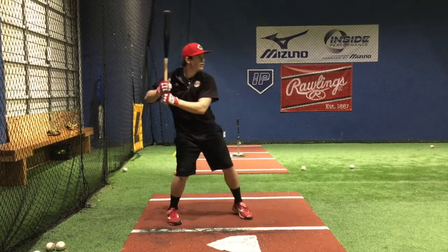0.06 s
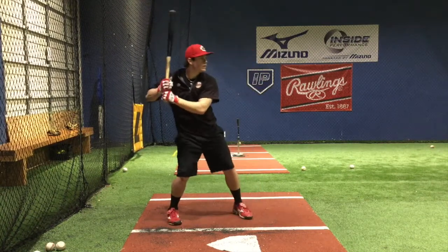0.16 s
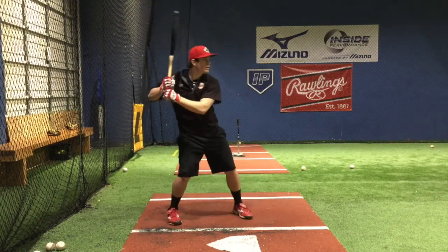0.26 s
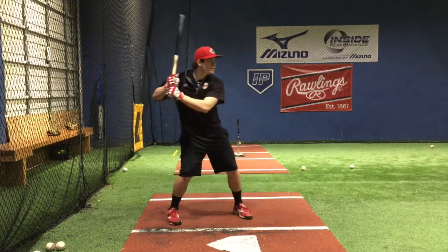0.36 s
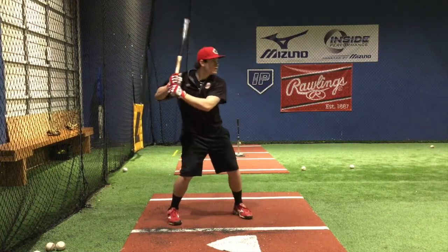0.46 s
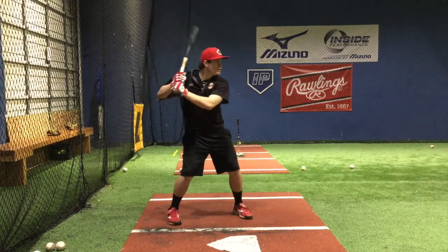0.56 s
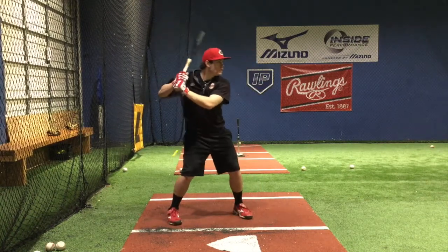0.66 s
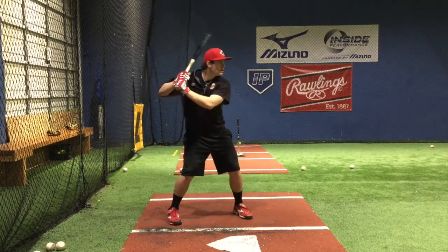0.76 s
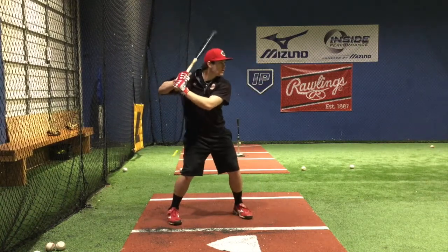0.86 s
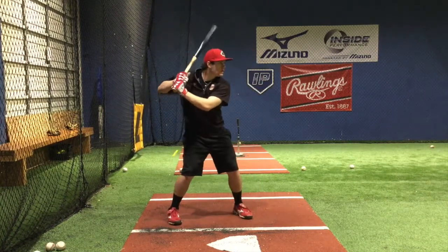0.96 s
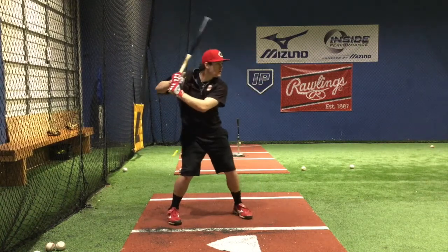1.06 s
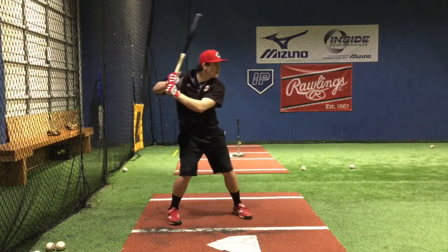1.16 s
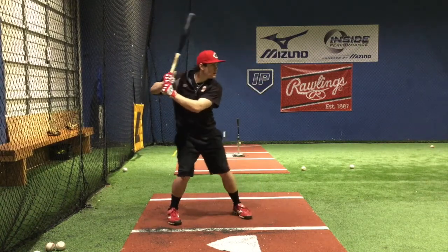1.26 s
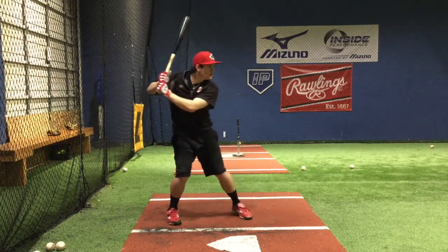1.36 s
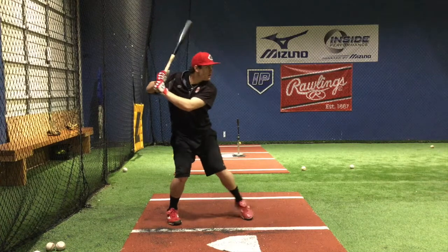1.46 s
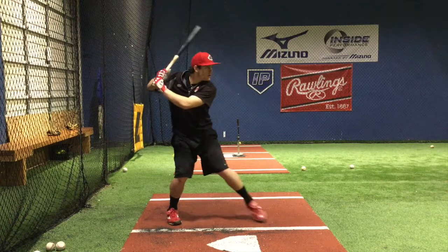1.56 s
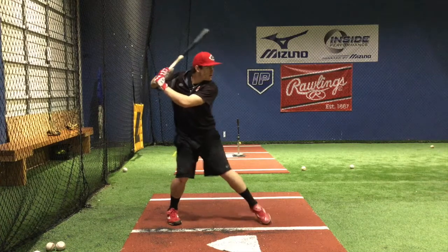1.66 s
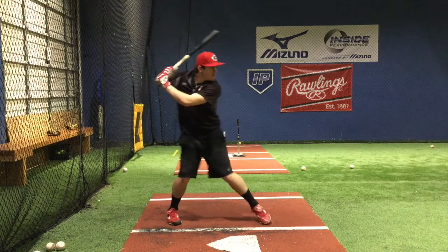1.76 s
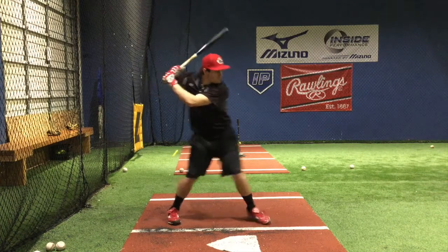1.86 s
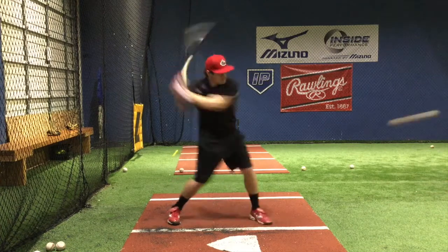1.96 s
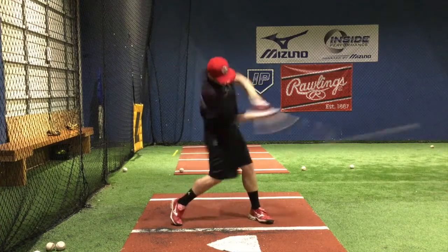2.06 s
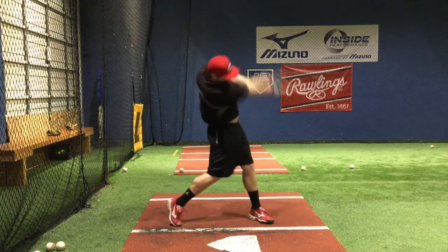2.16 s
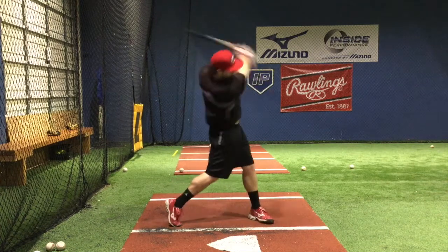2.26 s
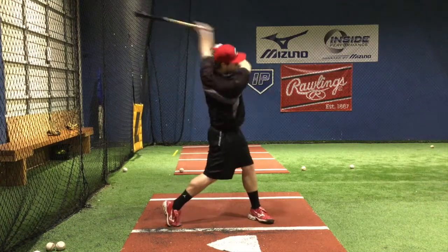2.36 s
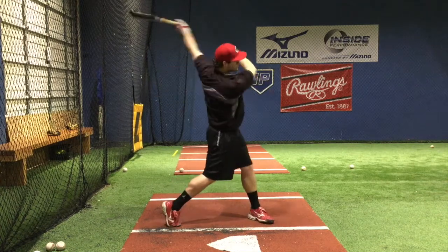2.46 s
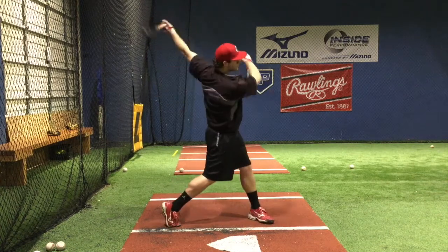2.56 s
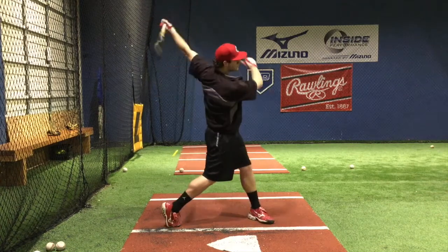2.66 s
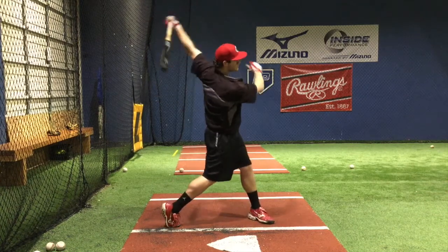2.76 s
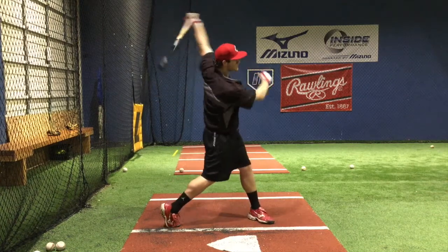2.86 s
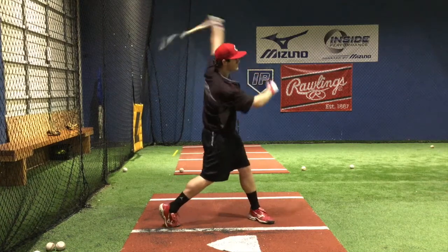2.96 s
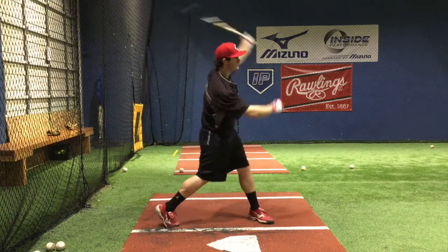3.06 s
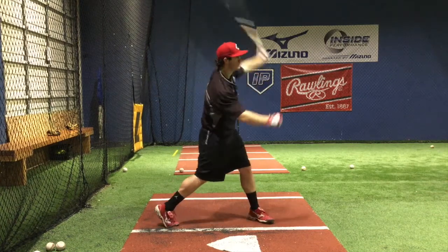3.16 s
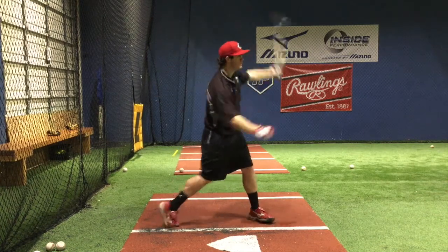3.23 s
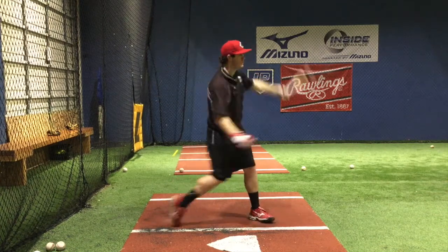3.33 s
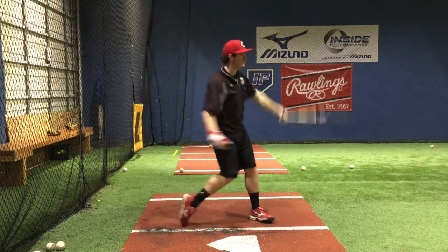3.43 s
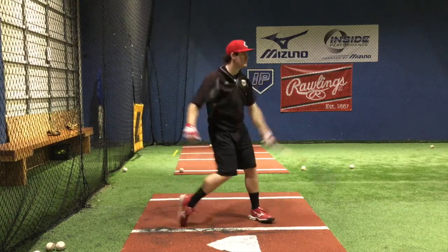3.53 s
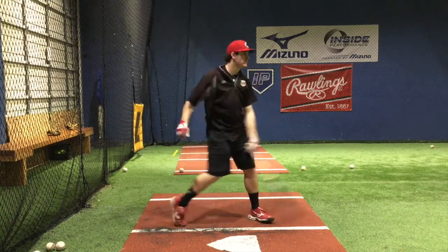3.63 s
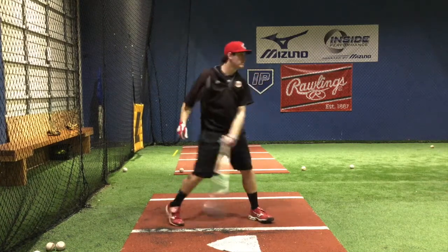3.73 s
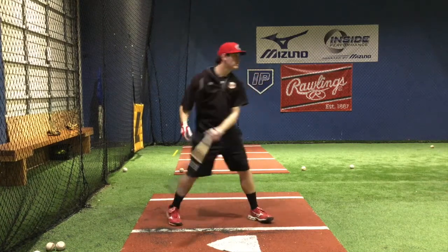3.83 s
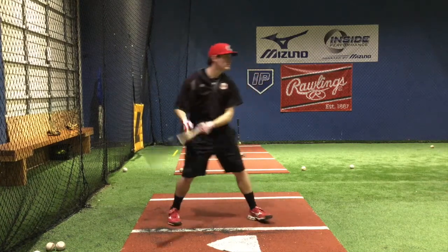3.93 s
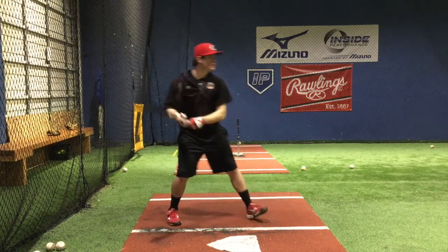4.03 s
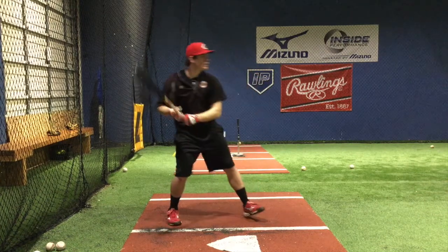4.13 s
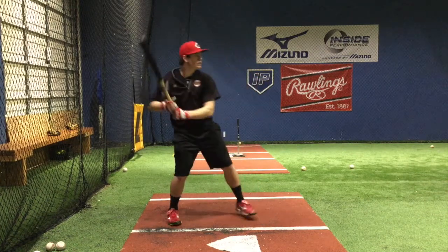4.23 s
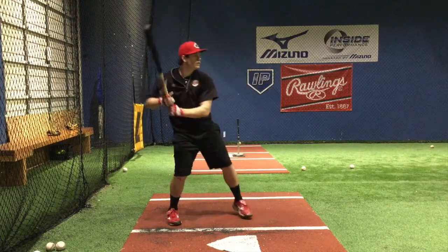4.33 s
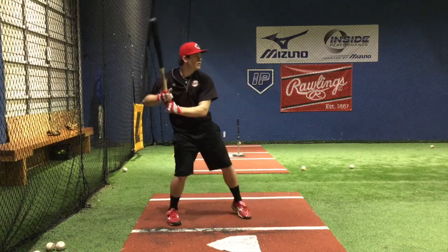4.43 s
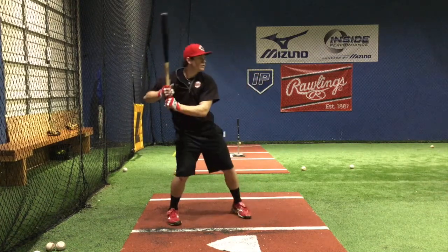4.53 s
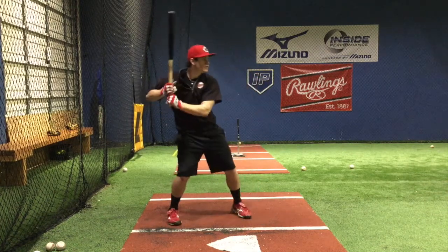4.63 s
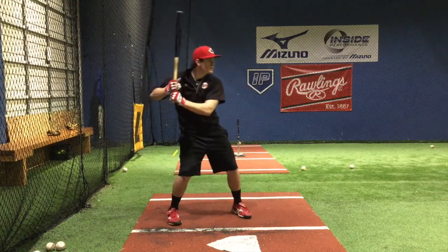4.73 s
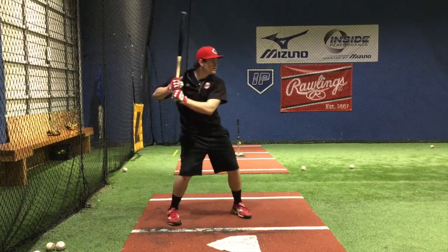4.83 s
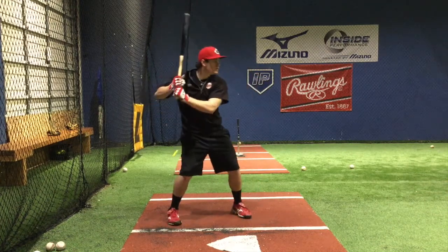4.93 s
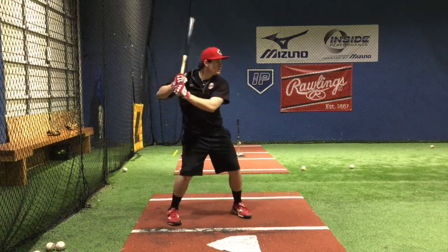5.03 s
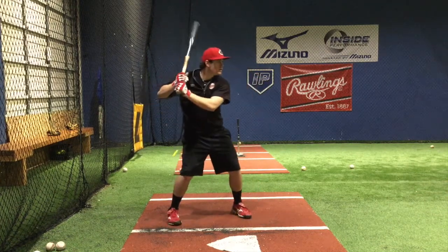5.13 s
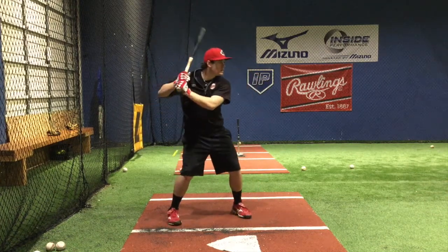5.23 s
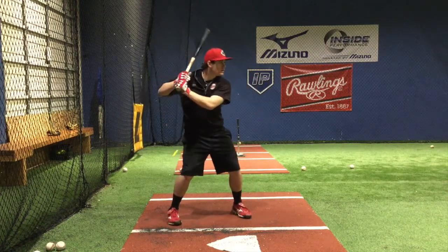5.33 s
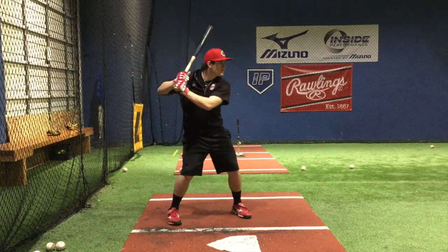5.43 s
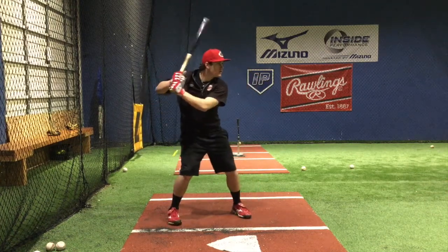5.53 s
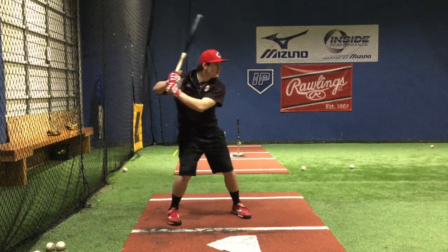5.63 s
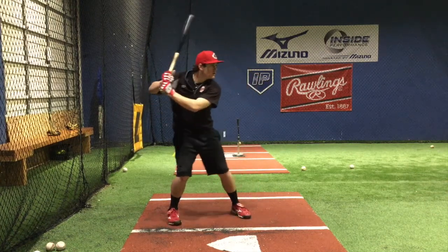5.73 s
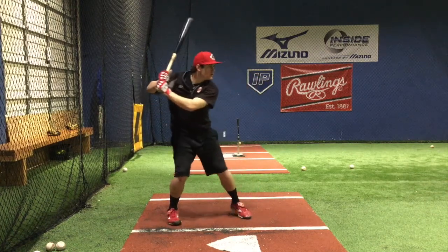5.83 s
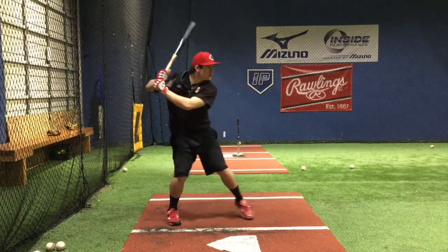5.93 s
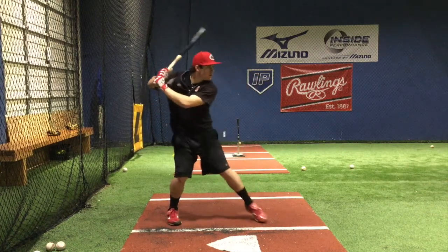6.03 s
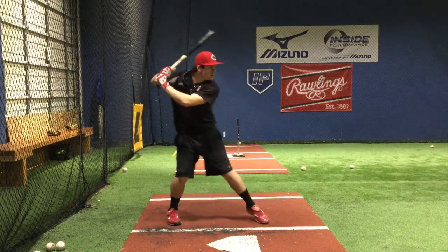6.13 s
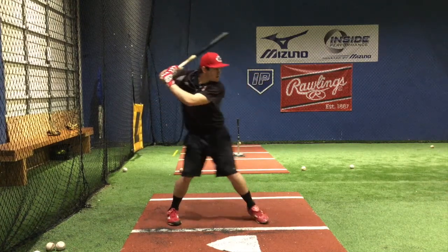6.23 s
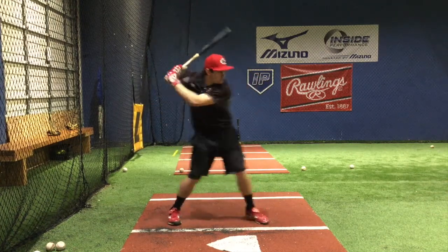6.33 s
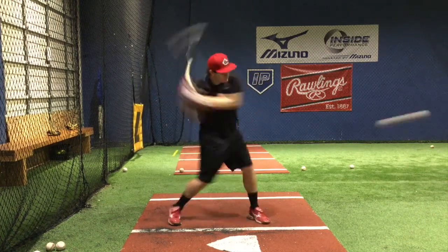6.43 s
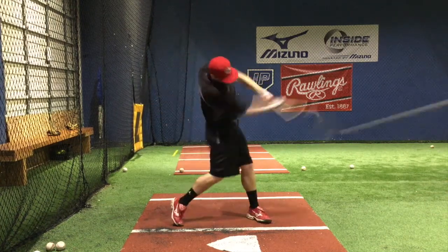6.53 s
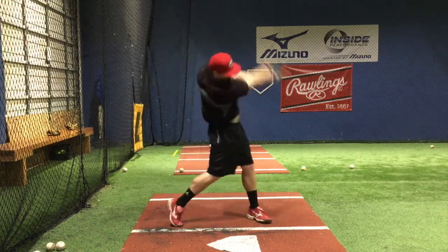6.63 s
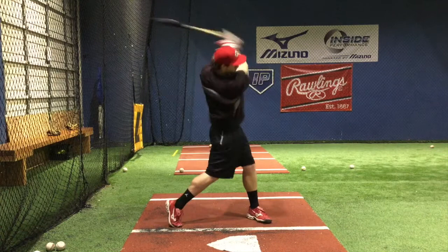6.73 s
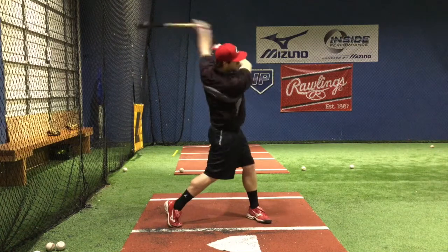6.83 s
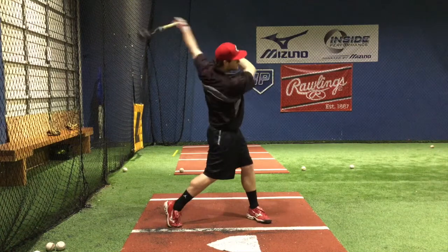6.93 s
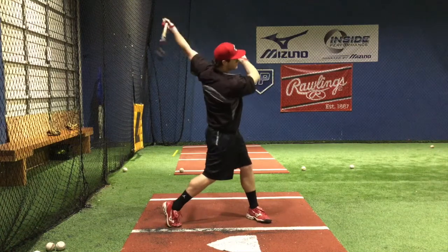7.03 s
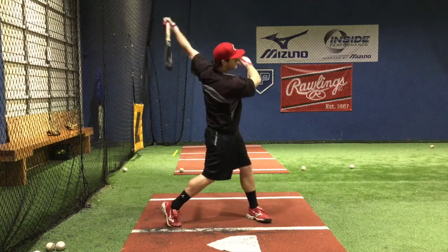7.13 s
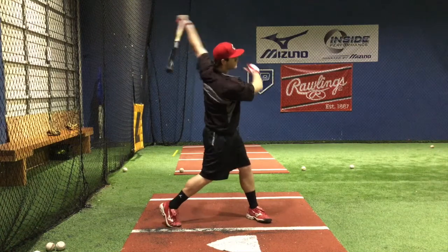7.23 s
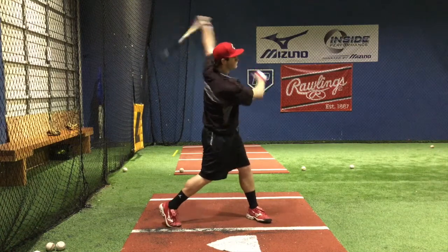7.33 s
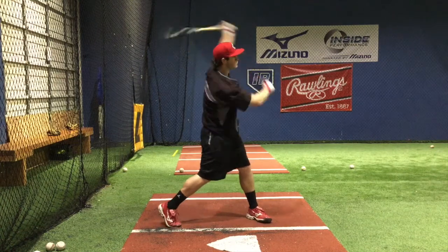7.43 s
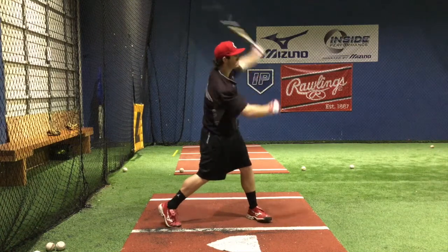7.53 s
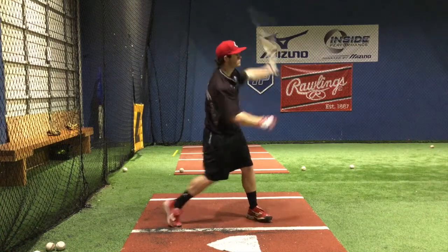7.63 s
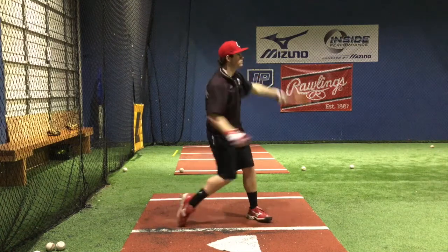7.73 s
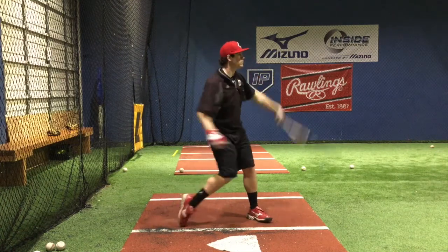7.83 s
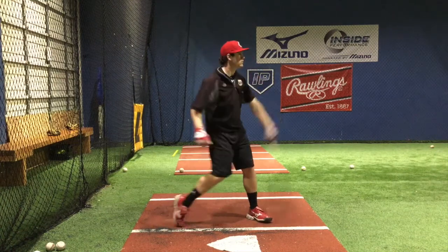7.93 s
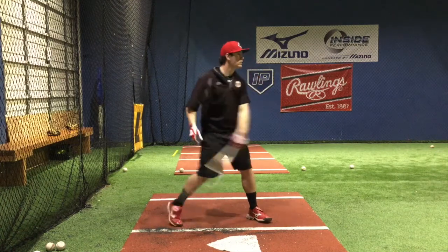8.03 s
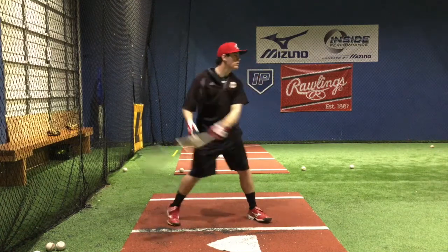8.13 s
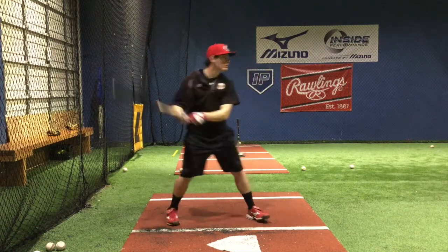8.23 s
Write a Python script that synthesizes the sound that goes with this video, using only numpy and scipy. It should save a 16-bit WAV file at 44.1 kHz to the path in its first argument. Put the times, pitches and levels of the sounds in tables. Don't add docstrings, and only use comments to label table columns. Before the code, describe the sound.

Two sharp, overloaded bat cracks ring through a big hall, one followed by a hollow wall thud, with net rattles, turf shuffles and steady fan rumble.

```python
import sys
import numpy as np
from scipy import signal
from scipy.fft import rfft, irfft
from scipy.io import wavfile
from scipy.ndimage import uniform_filter1d

SR = 44100
rng = np.random.default_rng(int(sys.argv[2]) if len(sys.argv) > 2 else 0)


def to_linear_factor(level_db):
    exponent = np.asarray(level_db, float) / 20
    return 10 ** exponent


def log_audio(samples):
    frames = np.atleast_2d(samples).T
    limited = np.clip(frames, -1, 1)
    pcm = np.round(limited * 32767).astype(np.int16)
    wavfile.write(sys.argv[1], SR, pcm)


N = 365148

# start in seconds, blow in dB, hall in dB, thump t60 in seconds, thump build-up in ms.
BLOWS = [
    (2.1350, 6, -21.5, 0.069, 1.5),
    (6.578, 6, -21, .065, 5.2),
]


def unit(x):
    return x / np.sqrt(np.mean(x ** 2))


def curve(hz, table):
    table_hz, values = np.array(table).T
    return np.interp(np.log(hz + 1), np.log(table_hz), values)


def colour(x, table):
    gain = to_linear_factor(curve(np.fft.rfftfreq(len(x), 1 / SR), table))
    return irfft(rfft(x) * gain, len(x))


def band(x, lo_hz, hi_hz):
    sos = signal.butter(2, [lo_hz, min(hi_hz, 20000)], "bandpass", fs=SR, output="sos")
    return signal.sosfilt(sos, x)


def walk(count):
    hold = SR // count
    steps = np.repeat(rng.standard_normal(N // hold + 1), hold)
    smooth = uniform_filter1d(uniform_filter1d(steps, hold), hold)
    return unit(smooth[:N])


def add(out, s, x):
    i = int(round(s * SR))
    out[i:i + len(x)] += x[:len(out) - i]


def ring(modes, size=22050):
    t = np.arange(size) / SR
    return sum(to_linear_factor(db - 60 * t / t60) * np.sin(2 * np.pi * hz * t) for hz, db, t60 in modes)


def swell(s, db, rise, fall):
    t = np.arange(N) / SR - s
    return to_linear_factor(db - 20 * np.maximum(t / fall, -t / rise))


def building():
    # multiple of the mains hum, level in dB.
    mains_lines = [(1, -44), (2, -53.5), (3, -69.5)]
    # multiple of the blade rate, level in dB.
    blade_lines = [(1, -52), (3, -65), (4, -65), (5, -63.5), (6, -72), (8, -84.5)]
    # frequency in Hz, level in dB per Hz.
    air_colour = [(25, -33.5), (42, -19.5), (56, -1), (78, -6), (105, -10), (165, -14), (230, -18),
                  (340, -24.5), (460, -35.5), (800, -40), (1300, -40), (3000, -51.5), (7500, -66.5),
                  (15500, -70.5)]
    mains_hz, blade_hz, air_db = 120.03, 69.75, -46.5
    t = np.arange(N) / SR
    out = np.zeros(N)
    for k, db in mains_lines:
        out += to_linear_factor(db + 2.5 + 0.5 * walk(count=3)) * np.cos(2 * np.pi * k * mains_hz * t)
    turn = 2 * np.pi * blade_hz * np.cumsum(1 + 0.0011 * walk(count=2)) / SR
    for k, db in blade_lines:
        out += to_linear_factor(db + 0.76 * walk(count=5)) * np.sin(k * turn)
    air = unit(colour(rng.standard_normal(N), air_colour))
    return out + air * to_linear_factor(air_db + 0.5 * walk(count=1))


def net():
    # peak in seconds, hiss in dB, body in dB,
    # rise in seconds, fall in seconds (both for 20 dB).
    rustles = [(1.96, -76.5, -67, 0.084, 0.37), (2.127, -60, -50, 0.033, 0.0025),
               (2.79, -66, -47, 0.0066, 0.21), (3.478, -72, -61.5, 0.06, 0.083),
               (3.728, -81.5, -80.5, .008, 0.028), (3.75, -85, -69, 0.013, 0.15), (4.472, -87, -83, .1, .2),
               (6.50, -77.5, -66.5, .3, 0.13), (6.568, -65.5, -55.5, 0.05, 0.0044),
               (7.212, -62, -47, 0.0059, 0.045), (7.229, -53, -50, 0.011, 0.043),
               (7.30, -71, -56, .05, 0.28), (7.842, -78.5, -65, 0.044, 0.07),
               (8.275, -77.5, -68, 0.086, 0.093)]
    # start in seconds, peak in dB, centre in Hz.
    clicks = [(2.7925, -39, 8500), (2.804, -40, 6500), (2.889, -49, 5500), (2.898, -50, 5500),
              (2.93, -54, 5000), (2.445, -40, 11000), (2.478, -41, 10000), (7.84, -63, 3500),
              (6.523, -51, 2700), (6.5255, -52, 3900), (6.525, -66, 9000), (2.584, -50, 9000),
              (2.812, -47, 8500), (7.2095, -47, 6500), (7.2095, -46, 3800), (7.2165, -31, 2300),
              (7.2165, -38, 4800), (7.2165, -46, 10000), (7.2285, -41, 6300), (7.2295, -41, 4200),
              (7.2285, -37, 2400), (7.233, -46, 10000), (7.237, -36, 2600), (7.281, -41, 2700),
              (7.244, -35, 2200), (7.256, -38, 2600), (7.27, -41, 2400)]
    # frequency in Hz, level in dB per Hz.
    hiss_colour = [(2500, -20), (4000, 0), (6500, 1), (10000, -3), (15000, -5)]
    # start in seconds, end in seconds, frequency in Hz, level in dB.
    squeak_row = (3.35, 3.445, 12000, -87)
    # middle in seconds, level in dB, centre in Hz, spread in seconds.
    scuff_row = (3.775, -62, 1300, .04)
    t, hiss, body = np.arange(N) / SR, np.zeros(N), np.zeros(N)
    for s, hiss_db, body_db, rise, fall in rustles:
        shape = swell(s, 0, rise, fall)
        hiss += to_linear_factor(hiss_db) * shape
        body += to_linear_factor(body_db) * shape
    grain_db = 1.6 * np.repeat(rng.exponential(size=N // 30 + 1), 30)[:N]
    grains = rng.standard_normal(N) * to_linear_factor(grain_db)
    rustling = hiss * unit(colour(grains, hiss_colour)) * to_linear_factor(3.5)
    rustling += body * unit(band(grains, 800, 2800))

    ticks = np.zeros(N)
    chance = rng.standard_normal((len(clicks), 600))
    for (s, db, hz), noise in zip(clicks, chance):
        tick = band(noise * np.exp(-t[:len(noise)] / 0.00086), hz * 0.66, hz * 1.4)
        add(ticks, s, to_linear_factor(db) * tick / abs(tick).max())

    start, end, hz, db = squeak_row
    squeak_level = to_linear_factor(db + 3 * walk(count=60))
    squeak_phase = 2 * np.pi * hz * np.cumsum(1 + 0.006 * walk(count=25)) / SR
    squeak_arch = np.sin(np.pi * np.clip((t - start) / (end - start), 0, 1))
    squeak = squeak_level * np.sin(squeak_phase) * squeak_arch

    s, db, hz, spread = scuff_row
    rub = unit(band(band(grains, hz * 0.55, hz * 1.8), hz * 0.55, hz * 1.57))
    scuff = to_linear_factor(db) * rub * np.exp(-((t - s) / spread) ** 2)
    return rustling + squeak + scuff, ticks


def lead_in(size=2205):
    # frequency in Hz, level at the blow in dB, time to rise 60 dB in seconds.
    blurs = [
        [(95, -14, .04), (240, -26, .04), (1300, -31, .035), (2650, -24, .04), (4400, -33, .03),
         (6300, -38, .035), (8300, -50, .035)],
        [(60, -24, .06), (150, -30, .04), (1300, -38, .035), (3050, -19, .035), (4400, -27, .025),
         (6000, -37, .03), (8300, -46, .03)],
    ]
    out = np.zeros(N)
    for (s, *_), modes in zip(BLOWS, blurs):
        waver = 1.2 + 2.0 * uniform_filter1d(rng.standard_normal(size), size=50)
        fading = ring(modes[:2], size=size) + ring(modes[2:], size=size) * waver
        add(out, s - size / SR, fading[::-1])
    return out


def hall(size=65536):
    # frequency in Hz, t60 in seconds.
    hall_t60 = [(200, 0.72), (500, 0.87), (1000, 1.34), (2200, 1.154), (4500, 1.104), (8000, 0.57),
                (14000, 0.42)]
    t = np.arange(size) / SR
    clumps = np.repeat(rng.exponential(size=size // 40 + 1), 40)[:size]
    clump_db = 3.6 * np.minimum(clumps, 3) * np.exp(-t / 0.7)
    dense = rng.standard_normal(size) * to_linear_factor(clump_db) * np.clip(t / 0.027, 0, 1)
    hz, spectrum, out = np.fft.rfftfreq(size, 1 / SR), rfft(dense), np.zeros(size)
    for centre in 125 * np.sqrt(2) ** np.arange(15):
        share = np.clip(1 - abs(2 * np.log2((hz + 1) / centre)), 0, 1)
        out += irfft(spectrum * share, size) * to_linear_factor(-60 * t / curve(centre, hall_t60))
    return out


def bat():
    # frequency in Hz, level in dB, t60 in seconds.
    barrel_modes = [(1217, -8.5, 0.016), (2400, -5, 0.024), (2870, -7, 0.024), (3902, -9, .012),
                    (5720, -17.5, 0.019), (8650, -28, 0.0082)]
    # frequency in Hz, level in dB per Hz.
    hall_colours = [
        [(150, -55.5), (250, -26), (292, -15), (482, -9.5), (525, -11), (795, -9), (2570, -6), (2900, -13.5),
         (13500, -24.5), (15500, -44)],
        [(150, -59.5), (250, -9.5), (341, -9.5), (534, -13.5), (781, -9), (867, -12.5), (2160, -3.5),
         (2850, -10.5), (12000, -23.5), (15500, -46)],
    ]
    # delays in seconds, then their levels in dB.
    echo_s = [.0130, .0256, .0303, .045, .1078, .127, .2525, .2645]
    echo_db = [-4, -7, -7, -5, -2.5, -5, -13, -10]
    out, t = np.zeros(N), np.arange(1, 2646) / SR
    for (s, blow_db, hall_db, t60, build_ms), tone in zip(BLOWS, hall_colours):
        swings = np.pi * np.log2(t / 0.0015) + 2 * np.pi * 8 * t
        thump = -np.sin(swings) * to_linear_factor(-60 * t / t60)
        thump *= 1 - 0.8 * np.exp(-1000 * t / build_ms)
        crack = to_linear_factor(-9.0) * rng.standard_normal(len(t)) * np.exp(-t / 0.00075)
        barrel = ring(barrel_modes, size=len(t)) + crack
        add(out, s, to_linear_factor(blow_db) * (thump + to_linear_factor(-3) * barrel))

        returned = colour(hall(), tone)[:-SR // 10]
        add(out, s, to_linear_factor(hall_db) * returned / np.std(returned[:SR // 5]))

        echo = band(band(barrel * np.exp(-t / 0.00059), 1300, 4900), 900, 5000)
        echo /= abs(echo).max()
        scatter = rng.standard_normal((len(echo_s), len(t)))
        for delay, db, noise in zip(echo_s, echo_db, scatter):
            cloud = to_linear_factor(-12.5) * band(noise, 1400, 4500) * np.exp(-t / 0.016)
            add(out, s + delay, to_linear_factor(db + hall_db + 19) * (echo + cloud))
    return out


def wall():
    # start in seconds, boom in dB, slap in dB.
    thuds = [
        (2.381, -8, -12.5),
        (2.388, -24, -19),
        (2.4, -6, -15.5),
        (2.444, -23, -39.5),
        (2.479, -36, -31),
        (2.607, -31, -44),
    ]
    # frequency in Hz, level in dB, t60 in seconds.
    panel = [(81, -8, 0.12), (99, -5, 0.1), (124, 6, 0.21), (144, 4.5, 0.12), (151.5, -2, 0.195),
             (185.8, 4.5, 0.19), (212.7, -6, 0.27), (241, -1.5, 0.13), (272, -7.5, 0.21),
             (327, -20.5, 0.52), (457, -6, 0.038), (650, -4.5, 0.03)]
    # peak in seconds, level in dB.
    shudder = [
        (2.429, -14),
        (2.54, -28.5),
        (2.637, -29.5),
        (2.74, -37),
        (2.791, -43),
    ]
    # frequency in Hz, level in dB.
    slap_colour = [(150, -7.5), (600, 11), (1200, 21.5), (2500, 7), (6000, -7.5), (8700, -4), (12000, -9),
                   (15000, -18)]
    slap_hall = [(200, -20), (600, 5), (1200, 4.5), (2500, 7.5), (4000, -3.5), (8700, -12), (15000, -26)]
    out, slaps, kicks = np.zeros(N), np.zeros(N), np.zeros(N)
    t = np.arange(int(0.06 * SR)) / SR
    chance = rng.standard_normal((len(thuds), len(t)))
    soft_push = np.exp(-t / 0.00069)
    boom = band(signal.fftconvolve(ring(panel), soft_push), 106, 900)
    boom /= abs(boom).max()
    slap_shape = np.exp(-t / 0.003) * np.minimum(t / 0.002, 1) * to_linear_factor(-1.5)
    for (s, boom_db, slap_db), noise in zip(thuds, chance):
        add(out, s, to_linear_factor(boom_db) * boom)
        add(slaps, s - 0.001, to_linear_factor(slap_db) * noise * slap_shape)
        add(kicks, s, to_linear_factor([slap_db]))
    rattle = signal.fftconvolve(rng.standard_normal(N), ring(panel))[:N]
    rattle = unit(band(rattle, 70, 980))
    knocks = sum(swell(s, db, rise=0.06, fall=0.15) for s, db in shudder)
    after_landing = np.arange(N) / SR > thuds[0][0]
    out += rattle * knocks * after_landing
    return out, colour(slaps, slap_colour), colour(kicks, slap_hall)


def duck():
    # depth in dB, hold in seconds, release in seconds.
    dips = [
        (-8, 0.33, 0.5),
        (-7.5, 0.1, 0.3),
    ]
    attack_s = 0.008
    t, gain_db = np.arange(N) / SR, np.zeros(N)
    for (s, *_), (db, hold, release) in zip(BLOWS, dips):
        corners = np.cumsum([0, attack_s, hold, release])
        gain_db += np.interp(t - s, corners, [0, db, db, 0])
    return gain_db


def scene():
    rustling, ticks = net()
    boom, slaps, kicks = wall()
    wet = signal.fftconvolve(to_linear_factor(-18.5) * kicks + to_linear_factor(-37.5) * ticks, hall())[:N]
    mix = building() + rustling + ticks + bat() + boom + slaps + wet
    return mix[None]


def top_cut(x):
    return signal.sosfilt(signal.butter(12, 16500, fs=SR, output="sos"), x)


def record(dry):
    x = dry * to_linear_factor(duck())
    x = 0.5 * np.tanh(x / 0.5) + lead_in()
    x = signal.sosfilt(signal.ellip(6, 0.5, 35, 14900, fs=SR, output="sos"), x)
    return top_cut(x)


dry = scene()
out = record(dry)
log_audio(out)
```